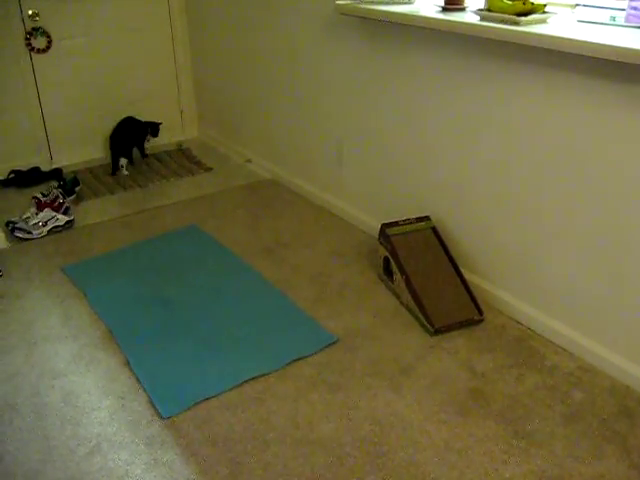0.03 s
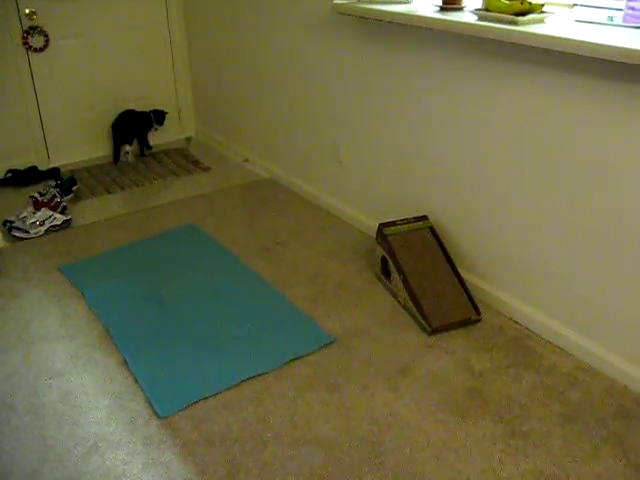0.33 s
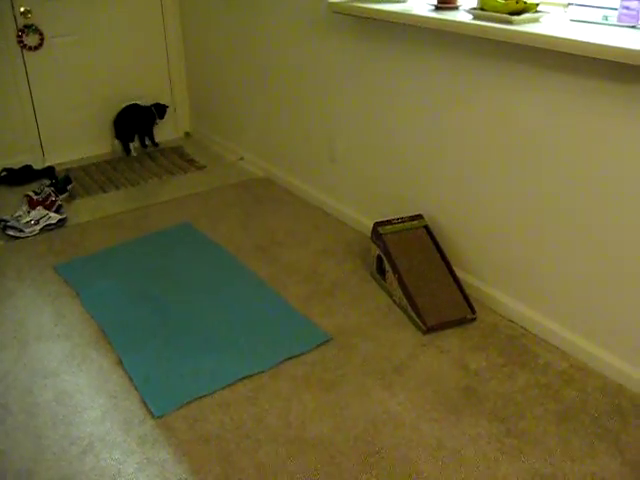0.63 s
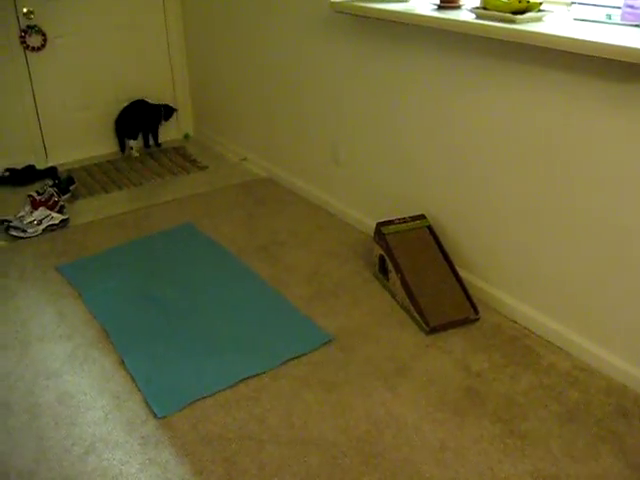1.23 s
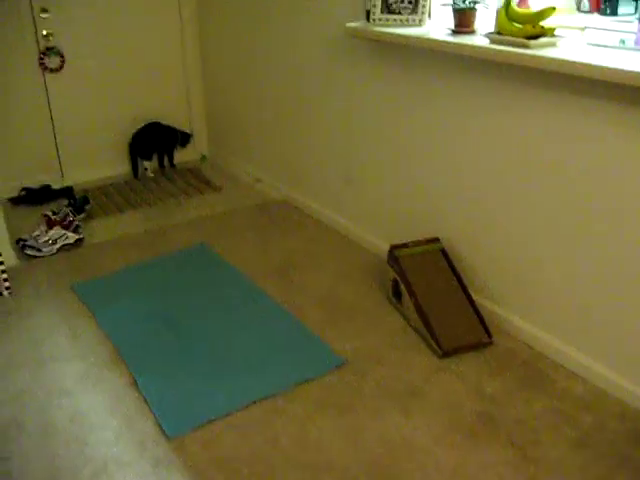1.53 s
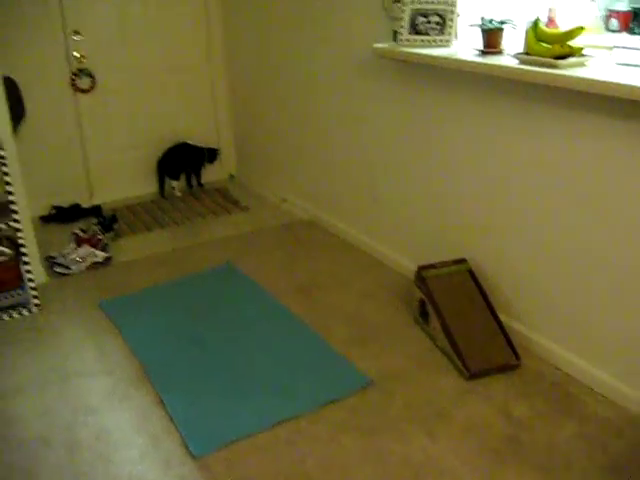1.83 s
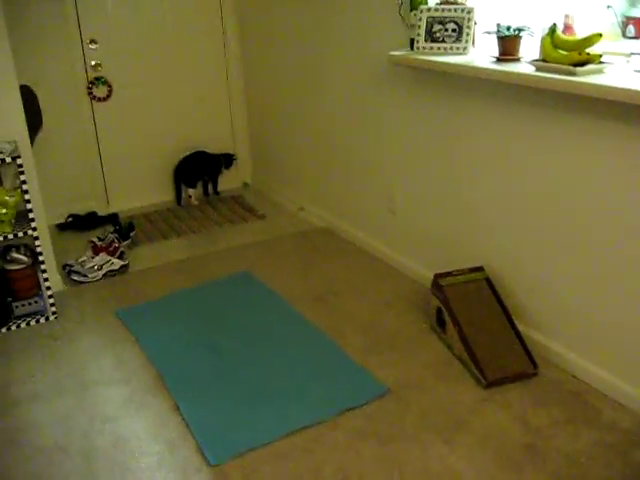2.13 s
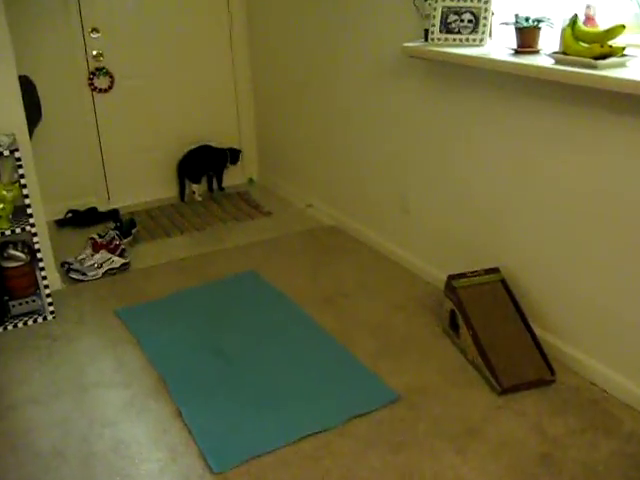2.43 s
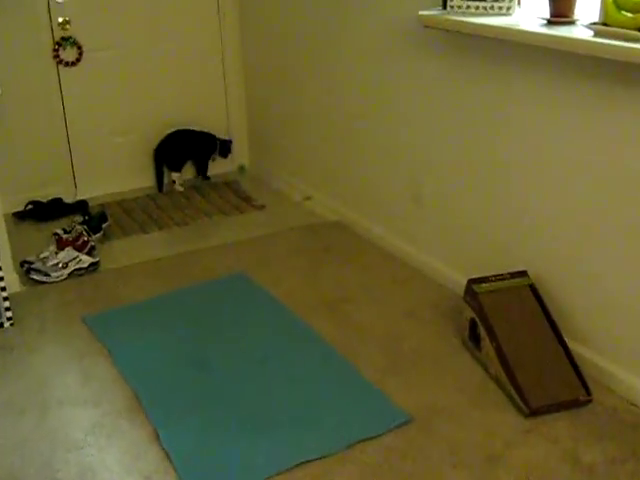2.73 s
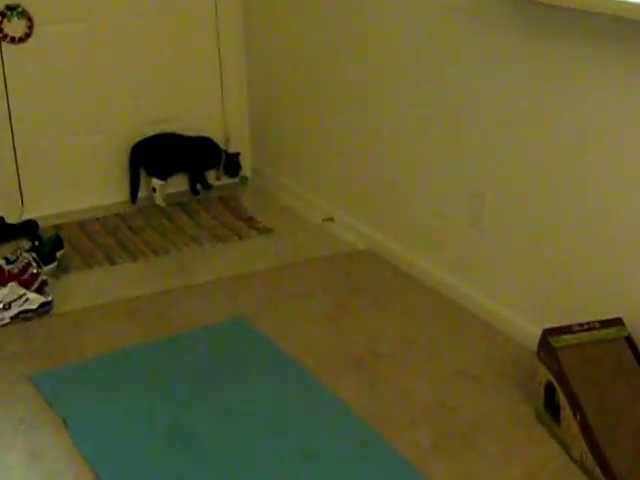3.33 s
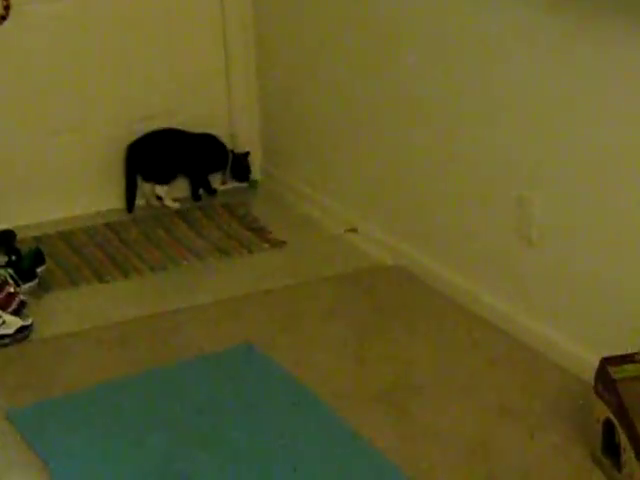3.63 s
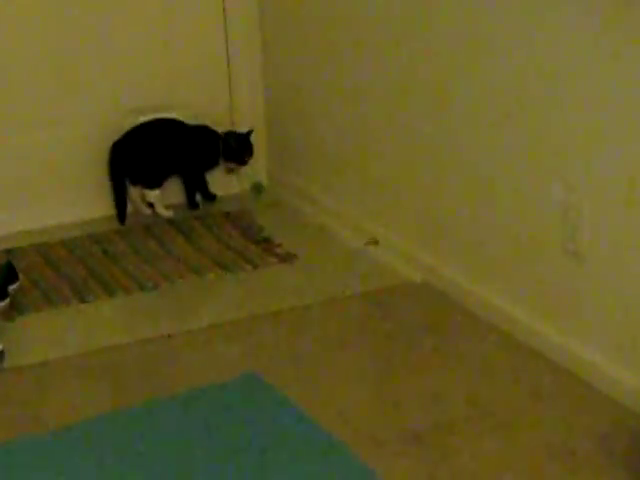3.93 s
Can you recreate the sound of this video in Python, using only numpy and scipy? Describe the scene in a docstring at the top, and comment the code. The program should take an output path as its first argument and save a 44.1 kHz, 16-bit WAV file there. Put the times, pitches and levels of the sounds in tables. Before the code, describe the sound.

A small bell inside a ball jingles high and fast for the first second as a cat bats it across carpet. Near the start, a lower bell chimes faintly and a knocked panel briefly shudders. From about 1.2 to 2.1 seconds come single tinkles, paw scuffs and plastic clicks. A few light clicks and taps follow around 2.6 to 3.1 seconds, then barely audible tinkles over room hum and hiss.

```python
"""A cat plays with a bell ball

A cat bats a ball across a carpeted room. The pellet inside rattles against a small bell, then settles
into single tinkles between scuffs and clicks of the plastic shell. A second, lower bell chimes at first,
and a panel by the door is knocked and shudders. Faint taps, room hum and microphone hiss lie underneath."""
import sys
import numpy as np
from scipy import signal
from scipy.fft import rfft, irfft
from scipy.io import wavfile

SR = 44100
rng = np.random.default_rng(int(sys.argv[2]) if len(sys.argv) > 2 else 0)


def master(y):
    """Save y as 16-bit WAV."""
    cut = np.clip(np.atleast_2d(y).T, -1, 1)
    pcm = np.round(cut * 32767)  # scale
    wavfile.write(sys.argv[1], SR, pcm.astype(np.int16))


N = 176400

# the small bell's main tones: f/Hz, level/dB, t60/s (the time to fade by 60 dB)
BELL_TONES = [(9070, 2, 0.029), (9020, -15, 0.015), (8810, -13, 0.023)]
CHATTER_S = .0028  # the pellet chatters against the shell, so each strike swells briefly
DETUNE_HZ = 30  # the loose pellet shifts the tones a little on each strike


def amp(db):
    """Turns decibels into a gain."""
    return 10 ** (np.asarray(db) / 20)


def unit(x):
    """Scales a sound to an average (rms) level of 1."""
    return x / np.sqrt(np.mean(x ** 2) + 1e-20)


def add(mix, s, sound):
    """Mixes a sound in, starting at s seconds."""
    part = mix[max(round(s * SR), 0):][:len(sound)]
    part += sound[:len(part)]


def noise(spectrum, size):
    """Noise of rms 1, shaped by a spectrum of f/Hz, level/dB points."""
    f, db = np.transpose(spectrum)
    hz = np.fft.rfftfreq(size, 1 / SR)
    gain = amp(np.interp(np.log(hz + 1), np.log(f), db))
    return unit(irfft(rfft(rng.standard_normal(size)) * gain, size))


def burst(spectrum, decay_s):
    """A puff of shaped noise that starts at once and dies away."""
    size = SR // 8
    fade = np.exp(-np.arange(size) / SR / decay_s)
    return unit(noise(spectrum, size) * fade) * np.sqrt(np.mean(fade ** 2))


def thud(spectrum, decay_s):
    """A short puff of noise sets an object's resonance ringing."""
    size = SR // 8
    f, db = np.transpose(spectrum)
    hz = abs(np.fft.fftfreq(size, 1 / SR))
    log_gain = np.log(amp(np.interp(np.log(hz + 1), np.log(f), db)))
    body = np.fft.ifft(np.exp(np.conj(signal.hilbert(log_gain)))).real  # rings only after the hit
    fade = np.exp(-np.arange(size) / SR / decay_s)
    puff = fade * rng.standard_normal(size)
    return unit(signal.fftconvolve(body, puff)[:size]) * np.sqrt(np.mean(fade ** 2))


def ring(tones, size):
    """The fading pure tones of a struck object."""
    t = np.arange(size) / SR
    return sum(amp(db - 60 * t / t60) * np.sin(2 * np.pi * hz * t) for hz, db, t60 in tones)


def room(x, wet_db, t60=0.2, echoes_per_s=2000):
    """Adds scattered, fading echoes off the floor and walls."""
    t = np.arange(SR // 2) / SR
    echoes = rng.standard_normal(len(t)) * (rng.random(len(t)) < echoes_per_s / SR)
    echoes *= (t > .002) * amp(-60 * t / t60)
    return x + amp(wet_db) * np.std(x) * unit(signal.fftconvolve(x, echoes)[:N])


def background():
    """Steady room noise and hiss, with slightly wavering hum."""
    # room noise and microphone hiss: f/Hz, relative level/dB
    hiss_spectrum = [(20, -19), (55, -6), (100, -7), (150, -4.5), (250, -5), (380, -7), (600, -8),
                     (1460, -12.5), (2200, -13.5), (4000, -18), (7000, -22.5), (9100, -23.5), (11500, -23),
                     (14500, -29.5), (16000, -52)]
    # mains hum and a thin electrical whine: f/Hz, level/dB
    hum_tones = [(120, -64.5), (237, -75.5), (2038, -76.5), (15734, -72)]
    # one more hum tone swells and fades: t/s, level/dB
    swell_levels = [(0, -73), (1.25, -70), (1.38, -59.5), (1.8, -73), (2.25, -61), (2.55, -72), (3.05, -63),
                    (3.5, -71.5), (3.9, -64.5)]
    t, swell_hz = np.arange(N) / SR, 355
    drift = [(1, 0), (3, -6), (12, -50), (100, -120)]  # slow wavering: f/Hz, level/dB
    hum = sum(amp(db) * np.sin(2 * np.pi * hz * t + 0.52 * noise(drift, N)) for hz, db in hum_tones)
    swell = amp(np.interp(t, *np.transpose(swell_levels)))
    hum += swell * np.sin(2 * np.pi * swell_hz * t + noise(drift, N))
    return amp(-53.5) * noise(hiss_spectrum, N) + np.sqrt(2) * hum


def taps(width_octaves=0.41, dull_hz=4870):
    """Soft bumps of paw and ball, each with one broad resonance."""
    # bumps: t/s, resonance/Hz, level before dulling/dB, decay/s
    bumps = [(.598, 1440, -51.5, 0.036), (.697, 2440, -46.5, .0042), (.934, 1400, -42, 0.0042),
             (.94, 1430, -52, 0.024), (2.825, 434, -50, 0.0078), (2.946, 695, -43.5, .0014),
             (3.349, 460, -44.5, 0.00087)]
    out = np.zeros(N)
    dull = signal.butter(2, dull_hz, fs=SR, output="sos")
    octaves = np.linspace(-4, 4, 33)
    for s, hz, db, decay_s in bumps:
        resonance = [(hz * 2 ** k, -20 * np.log10(1 + (k / width_octaves) ** 2)) for k in octaves]
        add(out, s, amp(db) * signal.sosfilt(dull, thud(resonance, decay_s)))
    return room(out, wet_db=-6.5)


def clicks():
    """Hard contacts: a hollow knock, a plastic snap and a bright edge of noise."""
    # contacts: t/s, knock f/Hz, knock level/dB, knock t60/s, snap level/dB, edge level/dB
    contacts = [(1.1786, 2450, -39, .005, -33, -37), (1.956, 2500, -45, .008, -42, -56),
                (2.6167, 2200, -34, .014, -46, -60), (2.9784, 540, -30.5, .008, -36.5, -49),
                (3.0857, 560, -31, .006, -37.5, -58)]
    # the plastic's tones: f/Hz, relative level/dB, t60/s
    snap_tones = [(1180, -4, .006), (3650, 0, .005), (4900, -10, .003)]
    # the bright edge: f/Hz, relative level/dB
    edge_spectrum = [(3000, -35), (7000, 6), (9500, 3), (11500, 14), (16000, -23)]
    out = np.zeros(N)
    for s, hz, knock_db, t60, snap_db, edge_db in contacts:
        add(out, s, ring([(hz, knock_db, t60)], SR // 8))
        add(out, s, amp(snap_db) * ring(snap_tones, SR // 8))
        add(out, s, amp(edge_db) * burst(edge_spectrum, decay_s=.0007))
    return room(out, wet_db=-9)


def scuffs(grain_db=3):
    """A paw rubs the plastic shell, which catches and slips: a hollow rasp and a high fizz."""
    # rubs: t/s, length/s, rasp level/dB, fizz level/dB
    rubs = [(0.521, 0.049, -50, -58), (1.384, 0.079, -56, -64), (1.437, 0.015, -48, -53),
            (1.488, 0.015, -45.5, -53), (1.495, 0.03, -46.5, -41), (1.608, 0.053, -56, -60),
            (1.713, 0.017, -45.5, -49), (1.9015, 0.029, -43.5, -51)]
    # how fast the shell slips: f/Hz, relative level/dB
    slip_spectrum = [(1, 0), (500, 0), (1500, -40), (5000, -80)]
    # the hollow rasp: f/Hz, relative level/dB
    rasp_spectrum = [(500, -9), (1600, -19), (2300, 7), (2800, -1), (3500, 0.5), (4700, -8.5), (6500, -9),
                     (9000, -13), (15000, -49)]
    # the high fizz: f/Hz, relative level/dB
    fizz_spectrum = [(6000, -40), (9000, -23), (10500, -12), (11400, -6), (12300, -13), (13500, -29),
                     (16000, -31)]
    out = np.zeros(N)
    for s, length, rasp_db, fizz_db in rubs:
        n = int(length * SR)
        stroke = np.sin(np.pi * (np.arange(n) / n) ** 0.59)  # rises fast, falls more slowly
        grain = unit(amp(grain_db * noise(slip_spectrum, n)))
        rasp = amp(rasp_db) * noise(rasp_spectrum, n)
        fizz = amp(fizz_db) * noise(fizz_spectrum, n)
        add(out, s, stroke * grain * (rasp + fizz))
    return room(out, wet_db=-11)


def knocks(damp_at_s=0.306, damp_over_s=0.013, damp_db=-5.5):
    """Knocks set a panel by the door shuddering; its ring is soon partly damped."""
    # knocks: t/s, ring level before damping/dB, clack level/dB
    hits = [(.131, -41.5, -38), (.202, -48.5, -41.5), (0.597, -54.5, -46)]
    # the panel's tones: f/Hz, relative level/dB, t60/s
    panel_tones = [(227, 0, 1.1), (296, 0, 1.0), (351, -.5, 1.0), (269, -5, .9), (243, -8, .8),
                   (390, -8, .6), (915, -7.5, .16), (1044, -6.5, .18), (1320, -8.5, .15)]
    # the clack of each knock: f/Hz, relative level/dB
    clack_spectrum = [(30, -62), (150, 6.5), (300, 15.5), (600, -15), (1100, 6.5), (1700, -13), (2250, -6),
                      (3200, -23), (8000, -50)]
    rings, clacks = np.zeros((2, N))
    for s, ring_db, clack_db in hits:
        add(rings, s, amp(ring_db) * ring(panel_tones, SR))
        add(clacks, s, amp(clack_db) * burst(clack_spectrum, decay_s=0.03))
    damping = np.clip((np.arange(N) / SR - damp_at_s) / damp_over_s, 0, 1)
    no_bass = signal.butter(3, 160, "highpass", fs=SR, output="sos")
    return signal.sosfilt(no_bass, rings * amp(damp_db * damping) + room(clacks, wet_db=-7))


def low_bell():
    """A second, lower bell chimes faintly during the first pounce."""
    # strikes on this bell: t/s, level/dB
    chimes = [(.001, -36), (.008, -38), (0.024, -39), (0.052, -48), (0.079, -45), (0.096, -41),
              (.109, -37.5), (.165, -46), (0.206, -53), (0.232, -40.5)]
    # its tones: f/Hz, relative level/dB, t60/s
    tones = [(5495, -4, .15), (5590, -3, .04), (6062, -10, .1), (13496, -12, .13), (14850, -15, .06)]
    out = np.zeros(N)
    swell = np.minimum(np.arange(SR // 2) / SR / CHATTER_S, 1)
    for s, db in chimes:
        detuned = [(hz + DETUNE_HZ * rng.standard_normal(), level, t60) for hz, level, t60 in tones]
        delay_s = rng.random() / tones[0][0]  # up to one vibration late
        add(out, s + delay_s, amp(db) * swell * ring(detuned, SR // 2))
    return room(out, wet_db=-3)


def pellet_strike(clink_db, rise_s=.0012):
    """One strike, peak 1: the small bell's tones swell and die under a brief metallic clink."""
    # the bell's faint side tones: f/Hz, relative level/dB, t60/s
    side_tones = [(8527, -29, .12), (8629, -24, .12), (9495, -29, .1), (9771, -29, .12), (9991, -34, .12)]
    # one faint tone that lingers: f/Hz, relative level/dB, t60/s
    lingering_tone = (9063, -21, .26)
    # the clink of pellet on metal: f/Hz, relative level/dB
    clink_spectrum = [(2000, -32), (6500, -20), (7700, -13), (8400, 5), (9300, 5), (10200, -3.5),
                      (12000, -13), (14000, -19), (16000, -32)]
    t = np.arange(SR // 4) / SR
    detuned = [(hz + DETUNE_HZ * rng.standard_normal(), db, t60) for hz, db, t60 in BELL_TONES]
    shimmer = [(hz, db - 3 + 3 * rng.standard_normal(), t60) for hz, db, t60 in side_tones]
    sound = ring(detuned + [lingering_tone] + shimmer, len(t))
    sound *= np.sin(np.pi / 2 * np.minimum(t / CHATTER_S, 1))
    add(sound, 0, amp(clink_db - 6) * burst(clink_spectrum, decay_s=0.0026))
    sound *= np.minimum(t / rise_s, 1)
    return sound / np.max(abs(sound))


def ball_bell(touches_per_s=230, settle_db_per_s=60):
    """Hard pellet strikes and light skittering ring the bell; the echoes change as the ball moves."""
    # hard strikes: t/s, relative level/dB, clink boost/dB
    strikes = [(.001, -29, 9), (.058, -25.5, 8), (.072, -14, 2), (.076, -24, 7), (.087, -16, 0),
               (.102, -20.5, -6), (.118, -16.5, -20), (.130, -20.5, -1), (.164, -15.5, -2),
               (.169, -20.5, -8), (.176, -16, -25), (0.191, -31, -22), (.205, -16.5, -12),
               (0.215, -20, -10), (0.224, -19.5, -21), (0.2944, -18.5, 2), (.305, -21, -7),
               (0.3114, -16.5, -11), (0.3138, -13, -3), (.331, -38, 0), (0.35, -35, 2), (0.364, -33, 16),
               (.382, -23, -4), (.394, -19.5, -4), (.42, -22, 4), (0.4708, -24, 4), (0.48, -21.5, 0),
               (.513, -17, -9), (.518, -16, -5), (.527, -25, -3), (.548, -19.5, -2), (.555, -18.5, -8),
               (0.593, -17.5, -4), (.6272, -18, 2), (.641, -16.5, -6.5), (.652, -23.5, 3),
               (.666, -21.5, -12), (0.6791, -22, -7), (.684, -19, -7), (.702, -29, 11), (.772, -21, -4),
               (.791, -25, 0), (.803, -25.5, 0), (.817, -30, 7), (.857, -33.5, 1), (0.915, -32, 2),
               (.9365, -27.5, -3), (.961, -22, -1.5), (.968, -25, 2), (.976, -28, -1), (0.981, -35, -4),
               (1.007, -31, -9), (1.077, -31, -13), (1.091, -28.5, -9), (1.115, -25, -5), (1.124, -36.5, 5),
               (1.423, -42, -8), (1.641, -36.5, -10), (1.679, -44, -12), (1.701, -29.5, -9),
               (1.723, -26.5, 3), (1.748, -46, -3), (1.831, -46, -7), (2.046, -47, -12), (2.07, -37.5, 0),
               (2.083, -38.5, -5), (2.112, -45, -12), (3.212, -53, -9), (3.565, -54, -9), (3.75, -53, -9)]
    # the pellet skittering inside the rolling ball: t/s, level/dB
    rolling = [(0, -24.5), (.04, -52), (.09, -34.5), (.22, -33.5), (.255, -34.5), (.29, -53), (.32, -30.5),
               (.46, -39), (.66, -48.5), (.75, -42), (.81, -50), (.89, -46), (.98, -54), (1.05, -48),
               (1.12, -45), (1.22, -72)]
    t, jingle = np.arange(N) / SR, np.zeros(N)
    for s, db, clink_db in strikes:
        delay_s = rng.random() / BELL_TONES[0][0]  # up to one vibration late
        add(jingle, s + delay_s, amp(db + 0.2) * pellet_strike(clink_db))
    touches = (rng.random(N) < touches_per_s / SR) * amp(-0.5 * np.clip(rng.standard_normal(N), -2, 2))
    spot = rng.integers(0, 8, N)  # eight spots on the bell, each with its own sound
    skitter = sum(signal.oaconvolve(touches * (spot == k), pellet_strike(clink_db=-0.5))[:N]
                  for k in range(8))
    settle_db = -settle_db_per_s * np.maximum(t - rolling[-1][0], 0)
    jingle += unit(skitter) * amp(np.interp(t, *np.transpose(rolling)) + settle_db)
    # fade through three sets of echoes, nine times a second
    shares = np.sin(np.pi * (t * 9 + np.arange(3)[:, None] / 3)) ** 2 / 1.5
    return sum(room(jingle * share, wet_db=-1.5) for share in shares)


def scene():
    """Everything as heard from across the room, in one channel."""
    return (ball_bell() + low_bell() + knocks() + scuffs() + taps() + clicks() + background())[None]


def record(dry):
    """The microphone loses one band of the treble and cuts off the very highest sounds."""
    notch_hz, notch_width_hz, cutoff_hz = 7890, 1100, 15850
    b, a = signal.iirnotch(notch_hz, notch_hz / notch_width_hz, SR)
    lowpass = signal.firwin(511, cutoff_hz, window=("kaiser", 9), fs=SR)
    return signal.oaconvolve(signal.lfilter(b, a, dry), lowpass[None], "same")


dry = scene()
out = record(dry)
master(out)
```